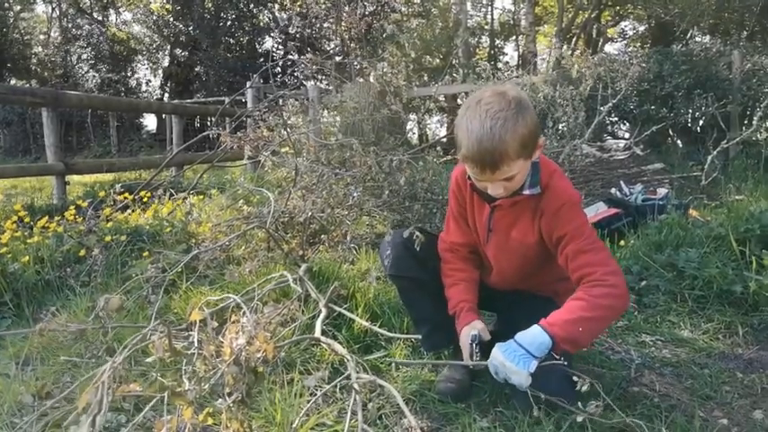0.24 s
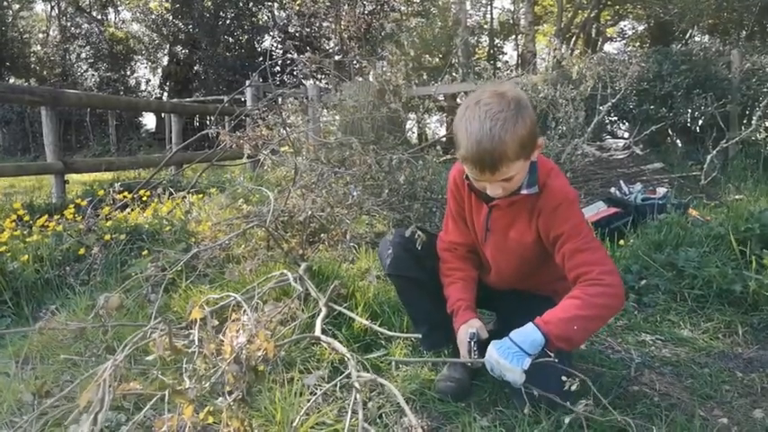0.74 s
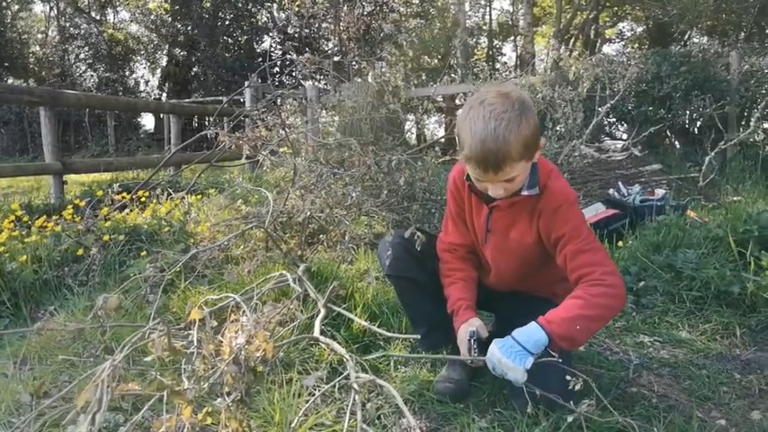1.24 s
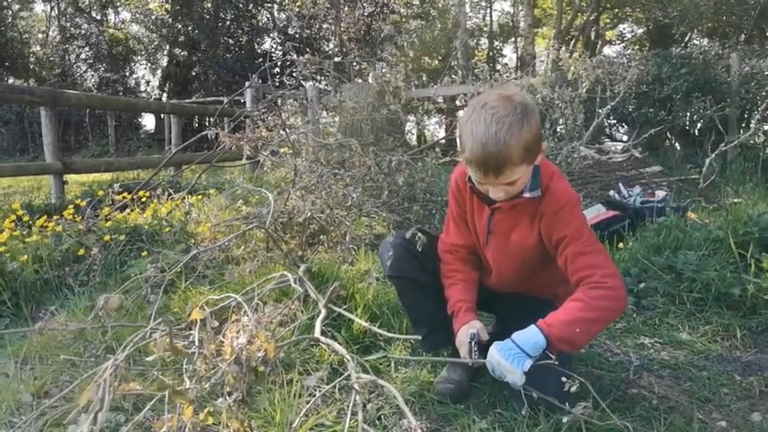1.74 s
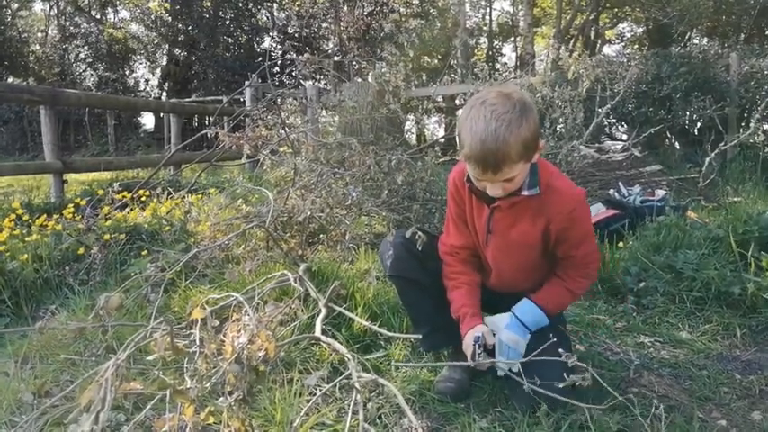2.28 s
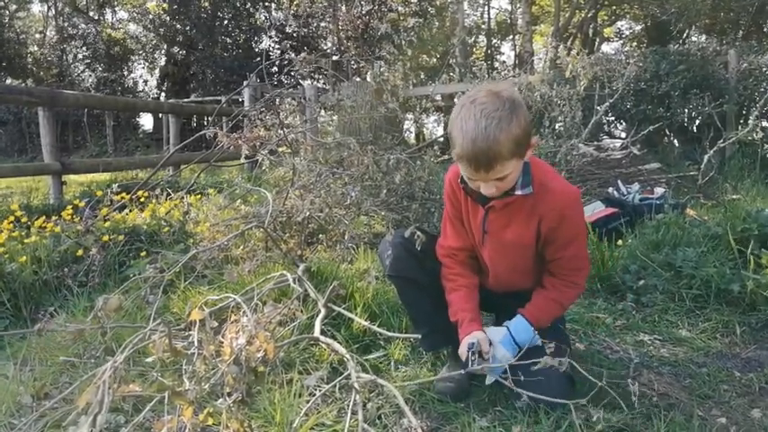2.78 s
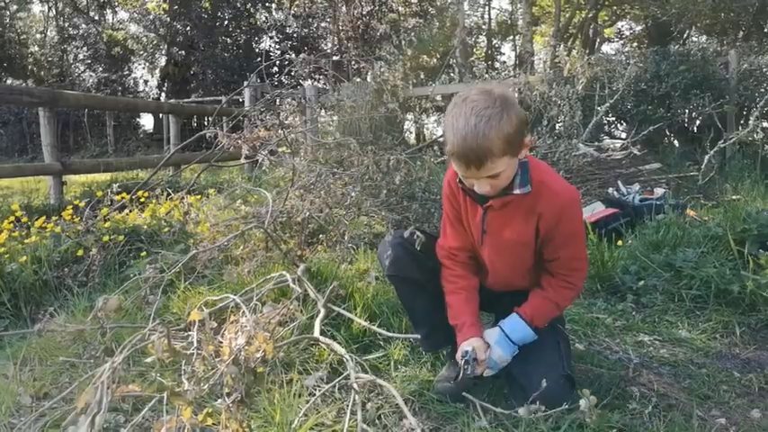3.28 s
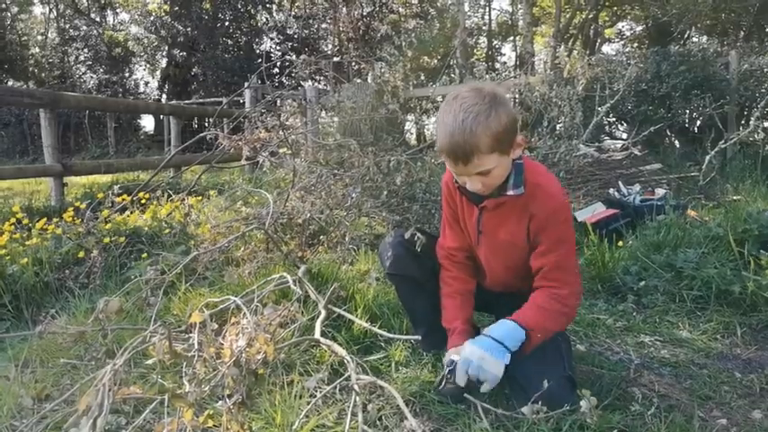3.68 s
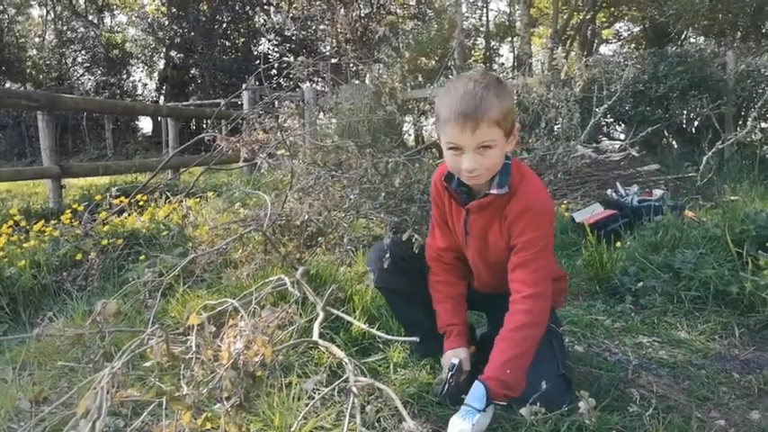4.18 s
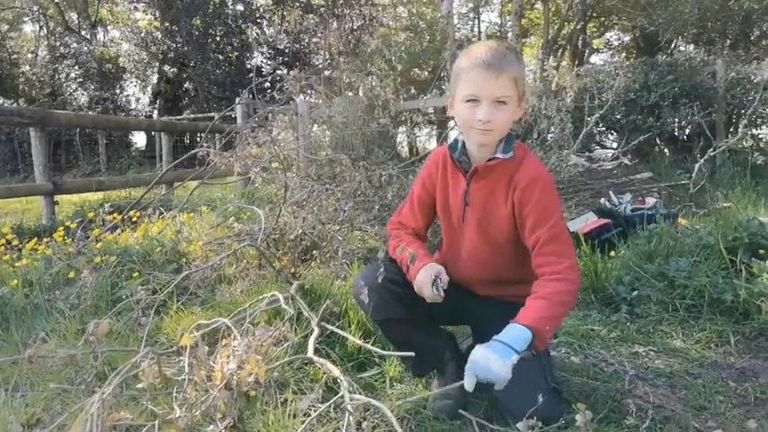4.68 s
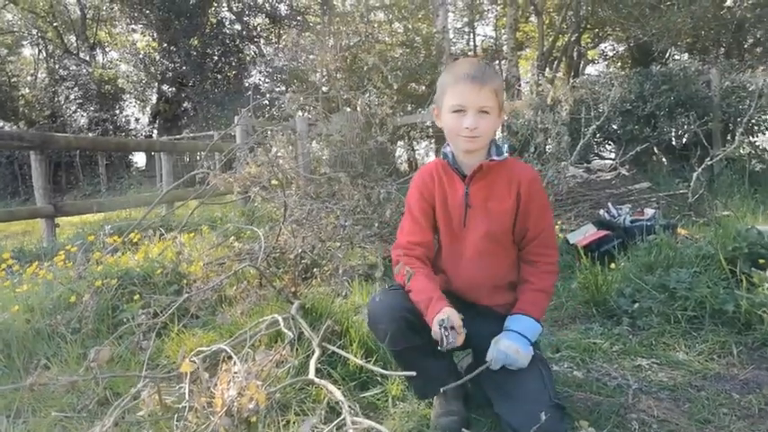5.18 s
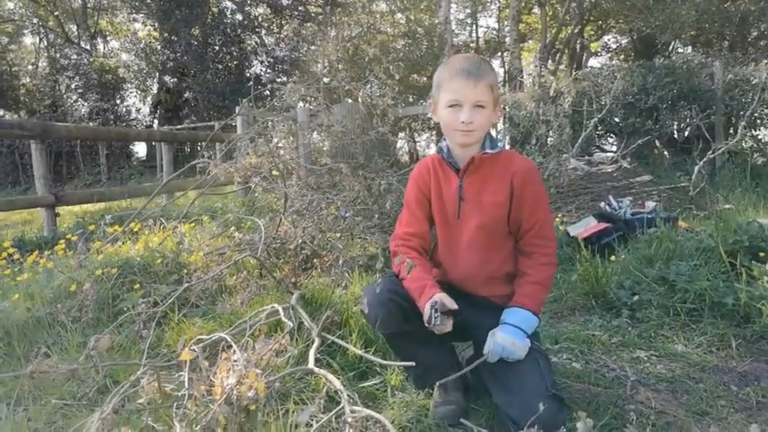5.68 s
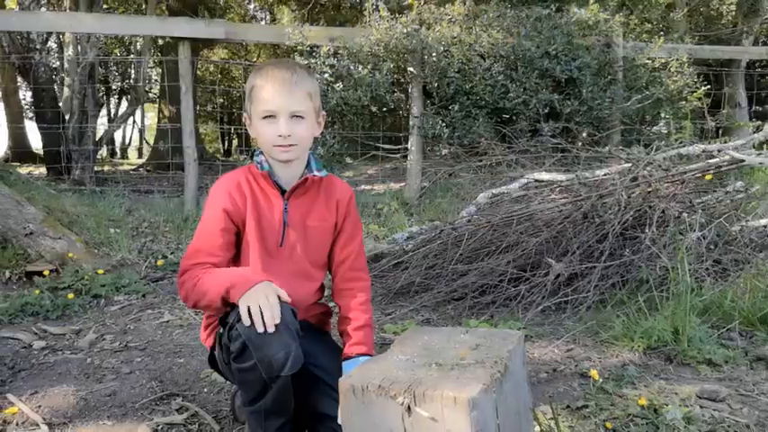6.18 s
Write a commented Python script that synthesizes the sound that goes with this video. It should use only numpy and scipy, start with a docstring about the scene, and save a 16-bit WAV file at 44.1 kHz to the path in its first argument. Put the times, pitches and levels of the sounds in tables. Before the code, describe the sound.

Wind rumbles low on the microphone and small birds twitter as secateurs snap sharply through a thin green stick, with glove rustles and tool clicks.

```python
"""Wind rumbles and small birds sing; then secateurs snap through a thin green stick in a garden.
Around the cut a glove and a sleeve rustle, twigs tap and crackle, and the tool clicks in the hand.
Wind, cloth and fractures are shaped noise; stick and blades ring as decaying sines; birds are gliding tones.
The trees blur the birds and answer the snap, until the sound stops dead and leaves silence."""
import sys
import numpy as np
from scipy import signal
from scipy.fft import rfft, irfft, next_fast_len
from scipy.io import wavfile
from scipy.ndimage import uniform_filter1d, map_coordinates

SR = 44100
rng = np.random.default_rng(int(sys.argv[2]) if len(sys.argv) > 2 else 0)


def wav_record(signal):
    """Record a signal, one row per channel, as 16-bit PCM in the file named by sys.argv[1]."""
    frames = np.transpose(np.atleast_2d(signal))
    bounded = np.clip(frames, -1, 1)
    # unit amplitude maps onto the largest positive 16-bit level
    quanta = np.round(bounded * 32767).astype(np.int16)
    wavfile.write(sys.argv[1], SR, quanta)


N = 283563
STOP_S, TOP_HZ = 6.034, 15750  # where the sound stops, middle of the steep treble cut


def amp(db):
    """Decibels to gain."""
    return 10 ** (np.asarray(db) / 20)


def unit(x):
    """Scale to rms 1."""
    return x / np.sqrt(np.mean(x ** 2) + 1e-20)


def along(points, hz):
    """Read (Hz, value) points on a log frequency axis."""
    f, v = np.transpose(points)
    return np.interp(np.log(hz + 1), np.log(f + 1), v)


def curve(rows):
    """Join (seconds, value) rows with straight lines, one value per sample."""
    return np.interp(np.arange(N) / SR, *np.transpose(rows))


def wobble(rate, size=N):
    """A smooth random curve with rate knots a second."""
    knots = rng.standard_normal(int(size * rate / SR) + 4)
    return map_coordinates(knots, [np.arange(size) * rate / SR])


def swells(rows):
    """Gain of events that each rise and fall like a bell; their powers add."""
    t = np.arange(N) / SR
    return np.sqrt(sum(amp(db) ** 2 * np.exp(-((t - s) / half) ** 2) for s, db, half in rows))


def panned(side_db):
    """Left and right gains for a left-minus-right level difference."""
    return amp(np.array([[.5], [-.5]]) * side_db)


def add(track, s, x):
    """Mix x into the track at time s."""
    i = max(0, round(s * SR))
    track[:, i:i + x.shape[-1]] += x[..., :N - i]


def filtered(x, gain):
    """Apply a gain that depends on frequency."""
    m = next_fast_len(x.shape[-1] + 8192)
    return irfft(rfft(x, m) * gain(np.fft.rfftfreq(m, 1 / SR)), m)[..., :x.shape[-1]]


def stereo(mid_side, side_db):
    """Left and right of rms 1; side_db sets how strongly the ears differ."""
    mid, side = mid_side * [[1], [amp(side_db)]]
    return unit(np.array([mid + side, mid - side]))


def noise(spectrum, side_db, size=N):
    """Coloured stereo noise of rms 1."""
    white = rng.standard_normal((2, size))
    return stereo(filtered(white, lambda hz: amp(along(spectrum, hz))), side_db)


def burst(spectrum, t60, side_db):
    """A sudden puff of noise that dies away: random in detail, always of the same colour and energy."""
    t = np.arange(SR // 8) / SR
    fade = amp(-60 * t / t60)
    # Only the phases are random; they keep the energy near the start
    phase = np.angle(rfft(rng.standard_normal((2, len(t))) * fade))
    colour = amp(along(spectrum, np.fft.rfftfreq(len(t), 1 / SR)))
    puff = irfft(np.exp(1j * phase) * colour, len(t))
    return stereo(puff * amp(-10 * t / t60), side_db) * np.sqrt(np.mean(fade ** 2))


def scattered(x, impulse):
    """Smear x with an impulse response whose left side has unit energy."""
    return signal.fftconvolve(x, impulse / np.linalg.norm(impulse[0]), axes=1)[:, :N]


# How long the trees hold sound. Each row: frequency in Hz, 60 dB decay time in seconds.
TREE_DECAY = [(300, .35), (2500, 0.63), (6000, 0.39), (14000, 0.54)]


def trees(x):
    """Trunks and leaves scatter a thin, late answer that builds up softly and decays by frequency."""
    hz, t, z = signal.stft(rng.standard_normal((2, SR)), SR, nperseg=256)
    decay = amp(-60 * t / along(TREE_DECAY, hz)[:, None])
    buildup = 1 - np.exp(-t / 0.004)
    return scattered(x, signal.istft(z * decay * buildup, SR, nperseg=256)[1])


# Colour of the large eddies. Each row: frequency in Hz, relative level in dB per Hz.
RUMBLE = [(12, -11), (22, 4.5), (35, -0.5), (55, -4), (90, -9.5), (130, -24.5), (220, -46.5), (500, -53.5),
          (1200, -100)]
# The rumble between gusts. Each row: time in seconds, relative level in dB.
BREEZE = [(0.0, -52), (0.18, -55.5), (1.71, -57.5), (2.48, -55), (4.26, -58), (4.88, -50.5), (5.85, -55),
          (6.02, -81)]
# Gusts hitting the microphone. Each row: peak time in seconds, relative peak level in dB, half length in seconds.
GUSTS = [(0.11, -35.5, 0.031), (0.32, -43, 0.011), (0.58, -48.5, 0.048), (0.81, -38.5, 0.013),
         (1.02, -41, 0.024), (1.11, -34, 0.014), (1.21, -44, .055), (2.09, -34, 0.011), (2.372, -34, 0.017),
         (2.5, -44, 0.052), (2.75, -40, 0.06), (4.8, -35.5, 0.043), (5.0, -34, 0.044), (5.11, -33.5, 0.02),
         (5.565, -37.5, 0.049), (5.92, -44, 0.15)]


def wind():
    """Eddies buffet the microphone; the large ones are alike in both ears and grow most in a gust."""
    breeze_trim_db, gust_trim_db = 4.5, -1.5
    breeze = amp(curve(BREEZE) + breeze_trim_db)
    gusts = amp(gust_trim_db) * swells(GUSTS)
    gust_db = 20 * np.log10(np.hypot(breeze, gusts))
    eddies = noise(RUMBLE, side_db=-20.5)
    # Even out the random strength so that the level follows breeze and gusts
    power = uniform_filter1d(np.mean(eddies ** 2, axis=0), SR // 12)
    strength = np.sqrt(np.abs(power) + 1e-6)
    # Small eddies differ more from ear to ear
    swirl = noise([(60, -9.5), (130, 4.0), (200, -7), (350, -24.5), (900, -48.5)], side_db=-14.5)
    swirl_db = -66.0 + 0.2 * (gust_db + 54.0)
    return amp(gust_db) * eddies / strength + amp(swirl_db) * swirl


# Colour of distant trees and open air. Each row: frequency in Hz, relative level in dB per Hz.
AIR = [(150, -32), (250, -4), (313, -13), (434, -15), (534, -14.5), (624, -14.5), (781, -11), (867, -10.5),
       (1070, -8), (1290, -12.5), (1950, -9), (2240, -10), (4100, -18.5), (5040, -17.5), (15500, -34)]


def open_air():
    """A soft, slowly drifting rush of noise from the open air."""
    drift = amp(0.93 * wobble(2))
    return amp(-69.5) * drift * noise(AIR, side_db=1.5) * panned(1)


def whine():
    """A very faint, almost steady sine on the left, its pitch trembling slightly."""
    pitch_hz = 7690 + 8 * wobble(40)
    return amp(-92.0) * panned(14) * np.sin(2 * np.pi * np.cumsum(pitch_hz) / SR)


def note(length, pitch_hz, swing_hz, flutter_db):
    """One bird note: a pure tone glides through the given pitches, with a quick, uneven vibrato."""
    size = int(length * SR)
    u = np.linspace(0, 1, size)
    steps = len(pitch_hz)
    glide = np.polyval(np.polyfit(np.linspace(0, 1, steps), pitch_hz, steps - 1), u)
    vibrato = np.sin(2 * np.pi * 95 * length * u + wobble(50, size=size))  # around 95 Hz
    vibrato = vibrato + 0.51 * wobble(120, size=size)
    tone = np.sin(2 * np.pi * np.cumsum(glide + swing_hz * vibrato) / SR)
    swell = signal.windows.tukey(size, .35)
    return unit(tone * swell * amp(flutter_db * wobble(110, size=size)))


def contour(hz, bend):
    """Start, middle and end pitch; bend is in semitones at the start and end against the middle."""
    return hz * 2 ** (np.array([bend[0], 0, bend[1]]) / 12)


# Far birds as a group. Each row: time in seconds, relative level in dB.
CHORUS = [(0, -67), (.33, -81.5), (.5, -72), (1.05, -71), (1.25, -81.5), (4.0, -79.5), (4.9, -100),
          (5.9, -82)]


def chorus(count=420):
    """Many far birds twitter at random, heard only through the trees."""
    out = np.zeros((2, N))
    for when, length, pitch, slope in rng.random((count, 4)):
        hz = 2700 * 2.15 ** pitch
        glide = [hz, hz * 1.7 ** (slope - .5)]
        add(out, when * STOP_S, note(0.027 + 0.029 * length, glide, swing_hz=60, flutter_db=3.5))
    return amp(curve(CHORUS)) * unit(trees(out))


# Buzzy trills. Each row: start in seconds, length in seconds, middle pitch in Hz, relative level in dB.
TRILLS = [(0.0, .044, 3800, -73), (0.163, .05, 6300, -75), (0.462, .12, 5060, -73.5),
          (0.634, .16, 4080, -78), (0.933, .17, 3550, -72), (1.553, .11, 5250, -74.5),
          (2.022, .087, 4190, -72), (2.103, .047, 3350, -70.5), (2.637, .05, 6190, -75.5),
          (3.311, .083, 3650, -69), (3.723, .09, 4220, -73), (3.795, .047, 3210, -70.5),
          (5.775, .066, 4020, -72.5)]


def trills():
    """A wide, fast vibrato makes each note buzz."""
    out = np.zeros((2, N))
    for s, length, hz, db in TRILLS:
        add(out, s, amp(db) * note(length, contour(hz, (.3, -0.41)), swing_hz=250, flutter_db=3.5))
    return out


# Short hooks that rise and level off. Each row: start in seconds, middle pitch in Hz, relative level in dB.
HOOKS = [(0.386, 4500, -75), (0.775, 4990, -78), (3.062, 5250, -72), (3.145, 5180, -75), (3.38, 5310, -75),
         (3.774, 5510, -79), (5.632, 5350, -69)]
# Steep upward sweeps. Each row: start in seconds, length in seconds, middle pitch in Hz, relative level in dB.
SWEEPS = [(0.43, .04, 5000, -71), (0.718, 0.02, 4780, -73), (1.137, 0.018, 4430, -72),
          (1.163, 0.017, 4580, -68.5), (1.323, 0.023, 4040, -66.5), (1.513, 0.044, 4970, -64),
          (3.52, 0.023, 4030, -77.5), (3.943, 0.044, 4610, -67.5), (4.2, 0.031, 4070, -71.5),
          (4.373, 0.028, 7300, -74.5), (4.451, 0.01, 7170, -71), (5.46, .022, 3900, -78.5)]
# Notes that dip and come back. Each row: start in seconds, length in seconds, middle pitch in Hz,
# relative level in dB.
DIPS = [(0.109, 0.07, 5990, -73), (0.532, 0.077, 4600, -73.5), (2.609, .032, 5795, -68.5)]
# Level whistles. Each row: start in seconds, length in seconds, middle pitch in Hz, relative level in dB.
WHISTLES = [(0.535, 0.069, 3140, -69), (0.584, 0.23, 3520, -73), (0.805, 0.11, 3110, -69.5),
            (1.21, 0.091, 3790, -73), (1.49, .13, 2110, -81), (2.434, 0.051, 1996, -72.5),
            (2.7, 0.061, 2948, -76), (2.773, 0.11, 2700, -69.5), (5.335, .06, 5900, -82.5)]


def clear_notes():
    """Hooks, sweeps, dips and whistles: pure tones, each kind with its own pitch contour."""
    out = np.zeros((2, N))
    hook_s = 0.051  # every hook is equally long
    hooks = [(s, hook_s, hz, db) for s, hz, db in HOOKS]
    kinds = [(hooks, (-1.81, .8)), (SWEEPS, (-3.5, 1.8)), (DIPS, (1.8, 2.3)), (WHISTLES, (-0.14, .1))]
    for notes, bend in kinds:
        for s, length, hz, db in notes:
            add(out, s, amp(db) * note(length, contour(hz, bend), swing_hz=35, flutter_db=3))
    return out


# Three slurs tumble down in a cascade. Each row: delay in seconds, length in seconds, start pitch in Hz,
# end pitch in Hz, level in dB against the cascade.
CASCADE = [(0, .033, 7200, 5850, -4), (0.024, 0.017, 6150, 4650, 7), (0.056, .038, 4250, 3300, 2.5)]
# When cascades sound. Each row: start in seconds, relative level in dB.
CASCADES = [(1.598, -77), (1.754, -76)]
# Falling slurs. Each row: start in seconds, length in seconds, start pitch in Hz, end pitch in Hz,
# relative level in dB.
FALLS = [(3.884, 0.042, 6500, 6040, -75.5), (4.05, 0.027, 8000, 7130, -78.5),
         (4.278, 0.044, 5900, 4090, -71), (4.481, 0.021, 5350, 4640, -61), (4.509, .06, 4284, 3600, -69),
         (4.561, 0.089, 3640, 3220, -74.5), (5.765, 0.039, 4550, 4250, -75)]


def falling_slurs():
    """Single slurs and cascades: each tone drops fast at first, then settles."""
    out = np.zeros((2, N))
    early_share = .68  # of the drop, done halfway through
    tumbles = [(s + delay, length, start, end, db + step_db)
               for s, db in CASCADES for delay, length, start, end, step_db in CASCADE]
    for s, length, start_hz, end_hz, db in FALLS + tumbles:
        middle_hz = start_hz + early_share * (end_hz - start_hz)
        add(out, s, amp(db) * note(length, [start_hz, middle_hz, end_hz], swing_hz=40, flutter_db=3))
    return out


def birds():
    """Clear notes and buzzy trills, blurred by the trees; the higher voices sit on the left."""
    clear, buzzy = clear_notes() + falling_slurs(), trills()
    direct = amp(-1) * clear + amp(-3.5) * buzzy
    blurred = trees(amp(-2.5) * clear + amp(-4.0) * buzzy)
    side = [(2600, -10.0), (3200, 4), (5000, 3.5), (6200, 16)]  # (Hz, left-right dB)
    return filtered(direct + blurred + chorus(), lambda hz: panned(along(side, hz)))


# Dull knocks of hand and stick. Each row: start in seconds, relative level in dB.
BUMPS = [(2.205, -61.5), (3.429, -62.5)]


def knocks():
    """Low, short noise bursts where hand and stick bump."""
    out = np.zeros((2, N))
    dull = [(120, -7), (350, -4.0), (700, -31.5), (3000, -33.5), (8000, -62.5)]
    for s, db in BUMPS:
        add(out, s, amp(db) * burst(dull, t60=0.078, side_db=-14.0))
    return out


# Cloth colour of the glove. Each row: frequency in Hz, relative level in dB per Hz.
CLOTH = [(300, -5), (700, -6.5), (2200, -3), (4000, -5.5), (7500, -0.5), (9000, -8.5), (12000, -0.5),
         (15500, -8)]
# Short strokes of the glove. Each row: peak time in seconds, relative peak level in dB, half length in seconds.
RUBS = [(2.32, -92, .12), (2.79, -71, 0.016), (2.915, -65.5, 0.07), (3.05, -63.5, 0.033),
        (3.18, -76.5, .035), (3.5, -84.5, 0.052), (3.945, -76, 0.028), (4.48, -78, 0.34),
        (5.04, -81, 0.083)]


def glove():
    """Grainy noise swells with each stroke of the glove, over a faint rest: cloth never lies quite still."""
    cloth = noise(CLOTH, side_db=-2.5)
    grain = amp(2 * wobble(49) + 4.3 * wobble(500))
    strokes = np.hypot(amp(-86.5), swells(RUBS))
    return strokes * unit(cloth * grain)


# Sweeps of the sleeve. Each row: peak time in seconds, relative peak level in dB, half length in seconds.
SWISHES = [(2.381, -69.5, 0.053), (3.49, -71.5, 0.058), (4.45, -74, 0.16), (4.84, -71.5, 0.11),
           (5.027, -62, 0.036)]


def sleeve():
    """Soft fluttering noise swells as the sleeve sweeps past."""
    colour = [(300, -2.5), (700, -11), (1600, -2.5), (2200, 2.5), (3600, -13), (8000, -24), (15000, -19)]
    fleece = noise(colour, side_db=-4)
    return swells(SWISHES) * unit(fleece * amp(2.5 * wobble(120)))


# Shared colour of all ticks before the treble lift. Each row: frequency in Hz, relative level in dB per Hz.
TICK = [(200, -7.5), (700, -13.5), (1400, -10), (2300, 10), (3500, -6.5), (7000, -17), (15000, -19.5)]
# The stick taps dully against hand and tool. Each row: start in seconds, relative level in dB.
TAPS = [(2.348, -55), (2.374, -57.5), (3.432, -56.5), (3.53, -57.5), (4.941, -59.5), (5.002, -58),
        (5.022, -54), (5.058, -57.5)]
# Bark and splinters crackle around the cut. Each row: start in seconds, relative level in dB.
CRACKLES = [(2.842, -51), (3.027, -59), (3.039, -57.5), (3.062, -74)]
# The tool clicks in the hand. Each row: start in seconds, relative level in dB.
CLICKS = [(3.161, -61), (4.1027, -56.5), (4.8364, -41)]


def ticks():
    """Taps, crackles and clicks are short noise bursts: the brighter the kind, the quicker it decays."""
    out = np.zeros((2, N))
    # (starts and levels, t60 in s, treble lift in dB of which half is reached at 5 kHz)
    kinds = [(TAPS, 0.033, -13.5), (CRACKLES, 0.015, 12.5), (CLICKS, 0.0065, 40)]
    for rows, t60, lift_db in kinds:
        colour = [(hz, level + lift_db * hz / (hz + 5000)) for hz, level in TICK]
        for s, db in rows:
            add(out, s, amp(db) * burst(colour, t60, side_db=1.0))
    return out


def handling():
    """Ticks and knocks of twigs and tool over the rub of glove and sleeve, all to the right."""
    return (ticks() + knocks() + glove() + sleeve()) * panned(-5.0)


# Quick fractures as the stick gives way. Each row: start in seconds, relative level in dB,
# 60 dB decay time in seconds.
FRACTURES = [(2.8594, -38, 0.02), (2.8612, -30.5, 0.023), (2.8642, -38.5, 0.0066), (2.8653, -12.5, .008),
             (2.8677, -30.5, .014), (2.87, -34.5, 0.0186), (2.884, -44, 0.036)]
# Colour of splitting wood. Each row: frequency in Hz, relative level in dB per Hz.
SPLIT = [(180, -17), (370, -10), (700, -23.5), (1050, -4), (1800, -9), (2500, -0.5), (3800, -8.5),
         (5300, -1), (7600, 1), (8500, -5.5), (14500, -12), (16000, -20.5)]
# Stereo place of the splitting. Each row: frequency in Hz, left-minus-right level in dB.
SPLIT_SIDE = [(1000, -1.5), (2500, -3), (4800, -5.5), (6300, 3.5), (9000, -2.5), (11000, -13.5),
              (15000, -11)]
# Stick and blades ring together. Each row: frequency in Hz, relative level in dB,
# 60 dB decay time in seconds, left-minus-right level in dB.
RING = [(1076, -22.5, 0.0076, -4.5), (2240, -15, .022, -9.5), (2590, -18, 0.016, -14.5),
        (5050, -8.5, 0.013, -13.5), (6300, -15, 0.013, 5.5), (7432, -13.5, 0.013, -0.5),
        (15100, -9, 0.005, -17.5)]


def snip():
    """Fibres tear, then the stick parts; each fracture rings stick and blades."""
    cracks, rings = np.zeros((2, N)), np.zeros((2, N))
    t = np.arange(SR // 8) / SR
    ring = sum(amp(db - 60 * t / t60) * panned(side) * np.sin(2 * np.pi * hz * t)
               for hz, db, t60, side in RING)
    ring = ring * (1 - np.exp(-t / 0.00029))  # soften the onset
    edge = [(6000, -38.5), (11000, -2.5), (14500, -2.5), (16500, -17.5)]
    for s, db, t60 in FRACTURES:
        add(cracks, s, amp(db) * burst(SPLIT, t60, side_db=-7.0))
        add(cracks, s, amp(db - 6) * burst(edge, t60=0.0048, side_db=-9.5))  # the sharp first edge
        add(rings, s, amp(db) * ring)
    direct = filtered(cracks, lambda hz: panned(along(SPLIT_SIDE, hz))) + rings
    # The right ear hears it 40 microseconds before the left
    direct = filtered(direct, lambda hz: np.exp(np.array([[-1j], [1j]]) * np.pi * hz * .00004))
    # Ground and nearby brush throw back a short, dense scatter
    brush = burst([(200, 4), (2500, 1.5), (6000, -9.0), (15000, -3.5)], t60=0.07, side_db=-5.5)
    return direct + amp(-16.5) * scattered(direct, brush) + amp(-27.0) * trees(cracks)


def scene():
    """Everything in the garden."""
    return snip() + handling() + birds() + wind() + open_air() + whine()


def record(dry):
    """The sound stops dead at STOP_S, and a steep low-pass cuts the treble around TOP_HZ."""
    running = np.clip((STOP_S - np.arange(N) / SR) / .008, 0, 1)
    return filtered(dry * running, lambda hz: np.clip((TOP_HZ - hz) / 400 + .5, 0, 1))


dry = scene()
out = record(dry)
wav_record(out)
```